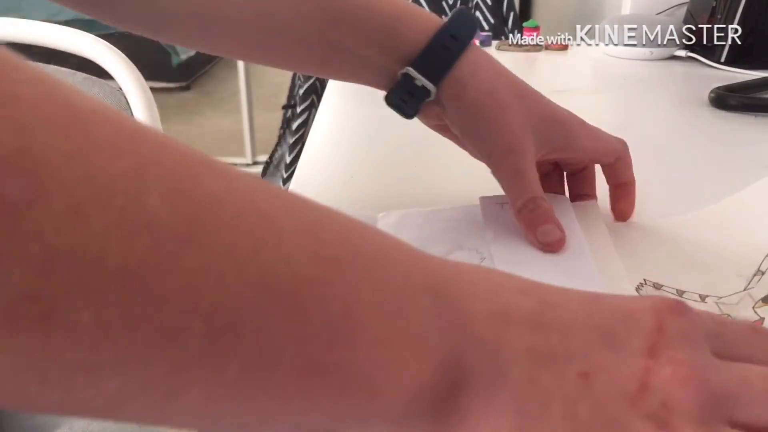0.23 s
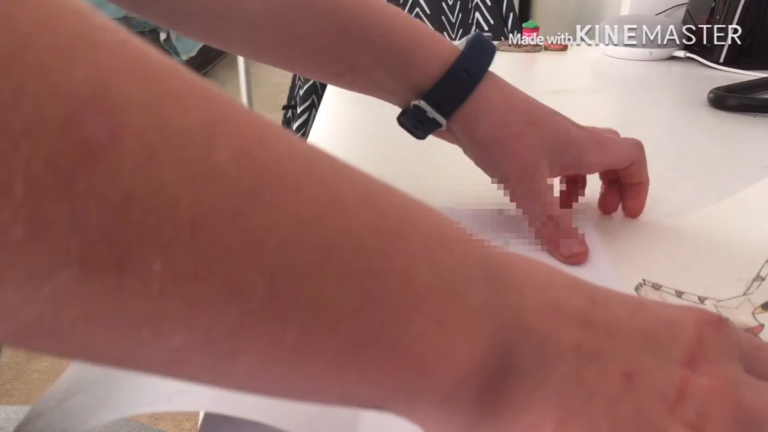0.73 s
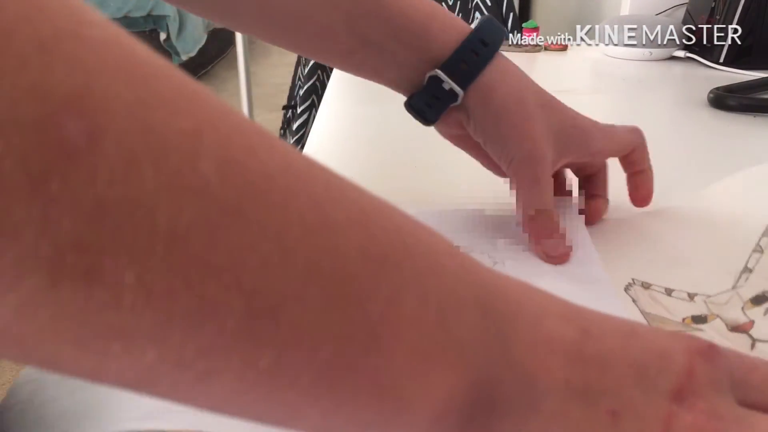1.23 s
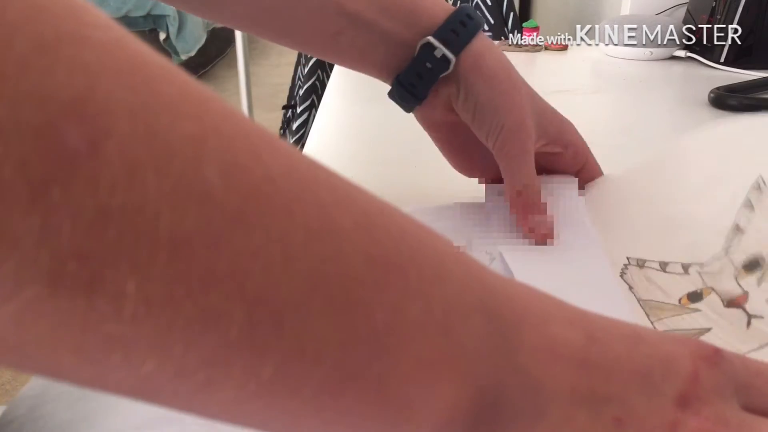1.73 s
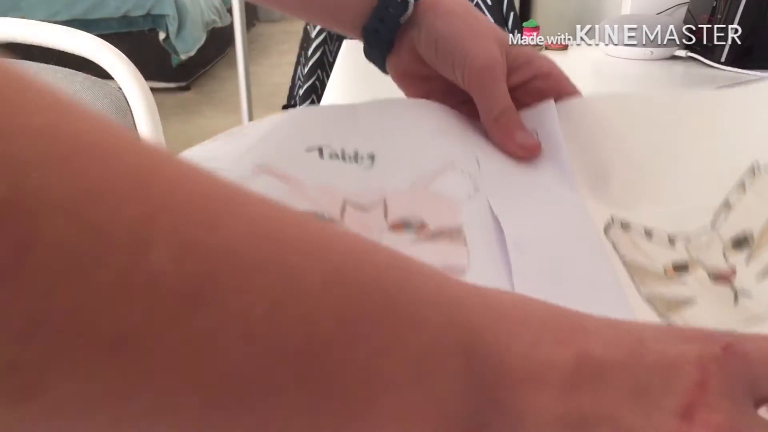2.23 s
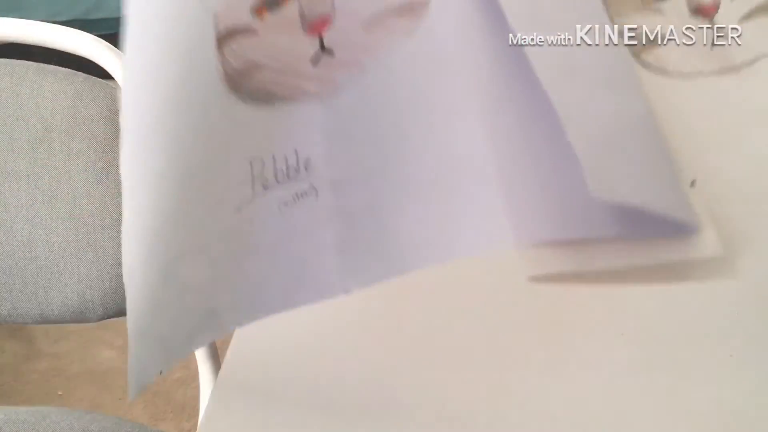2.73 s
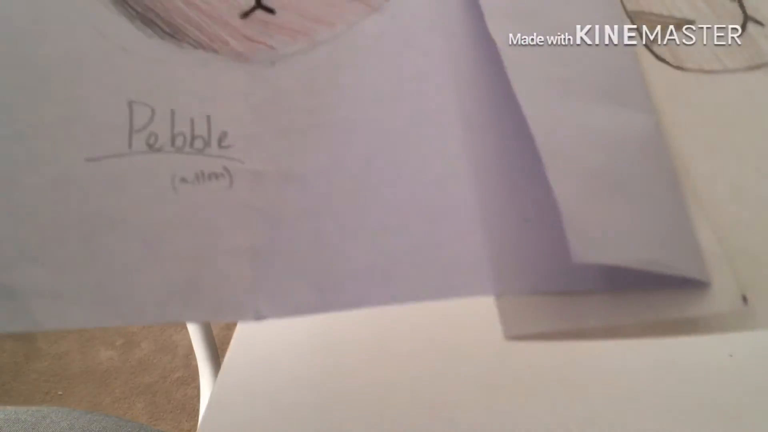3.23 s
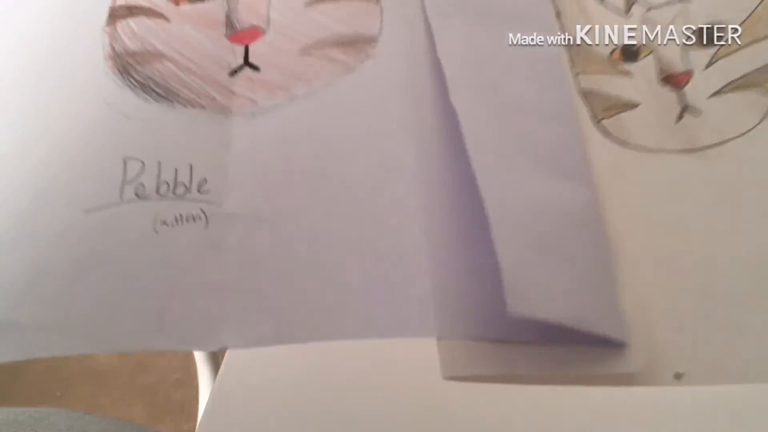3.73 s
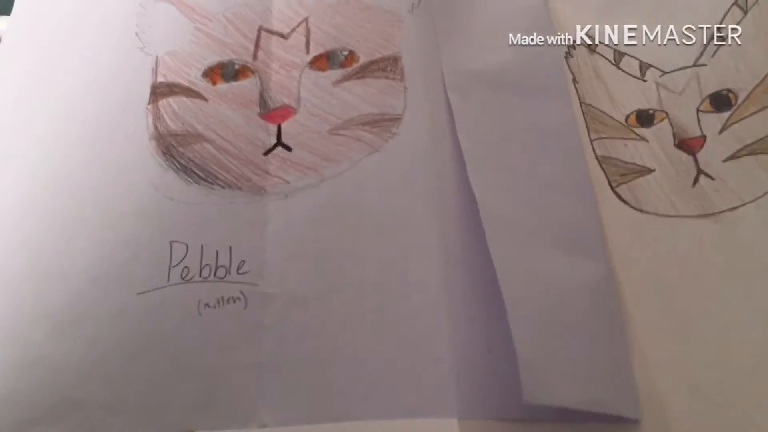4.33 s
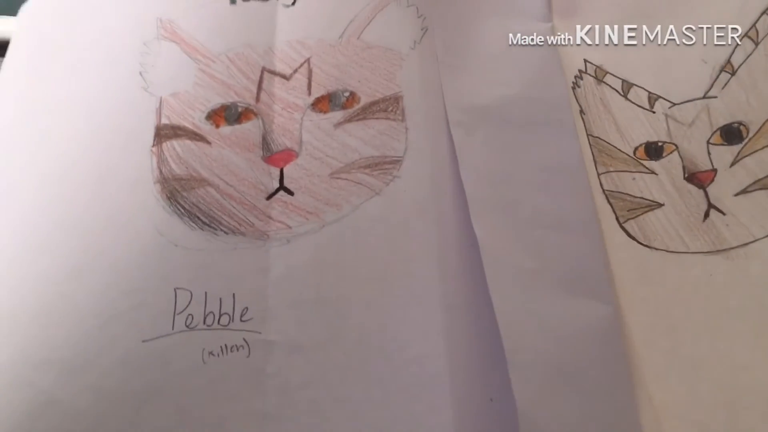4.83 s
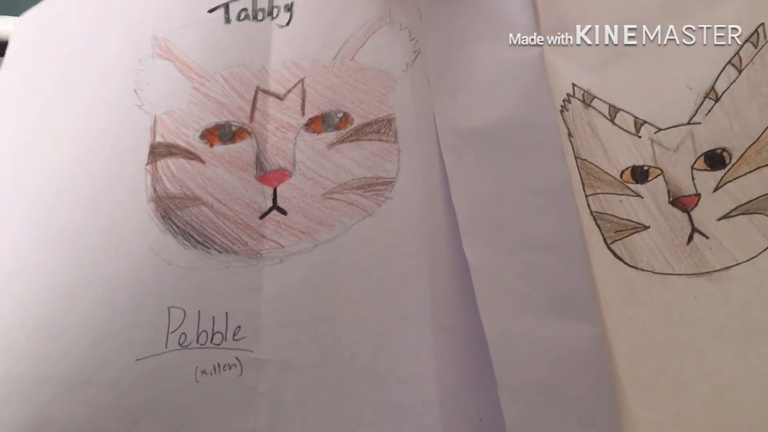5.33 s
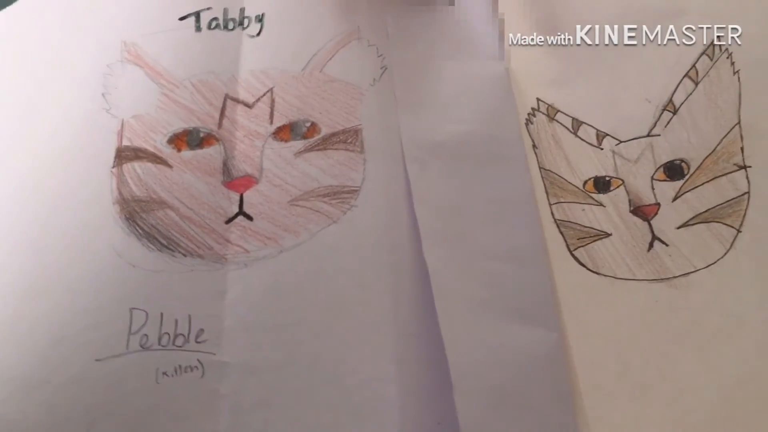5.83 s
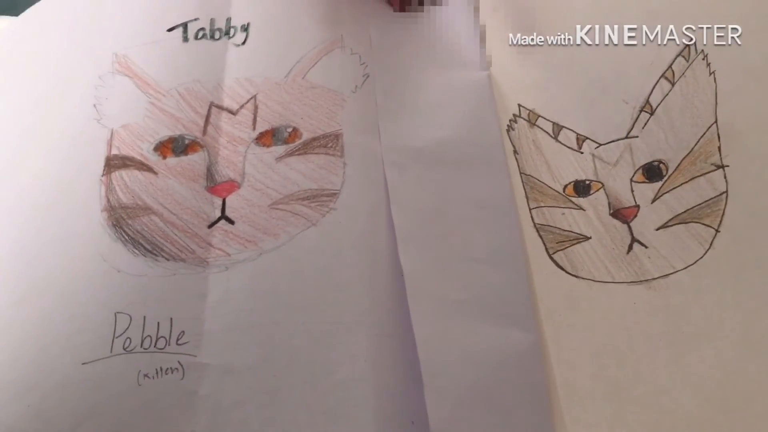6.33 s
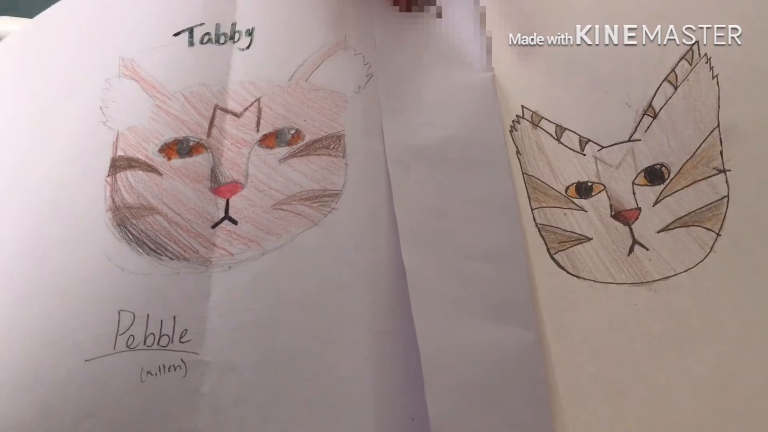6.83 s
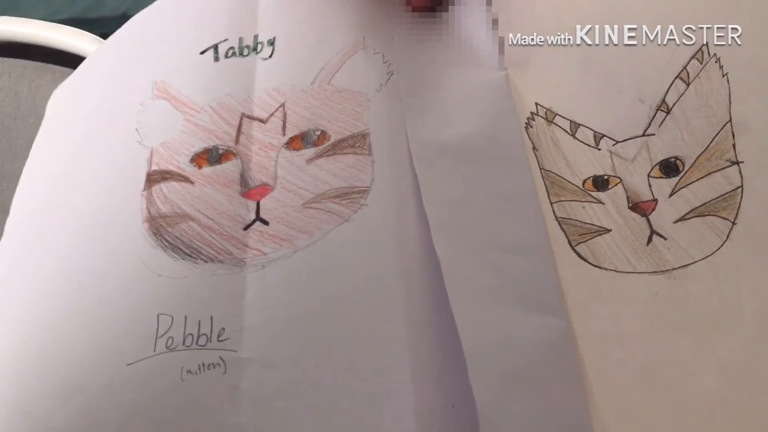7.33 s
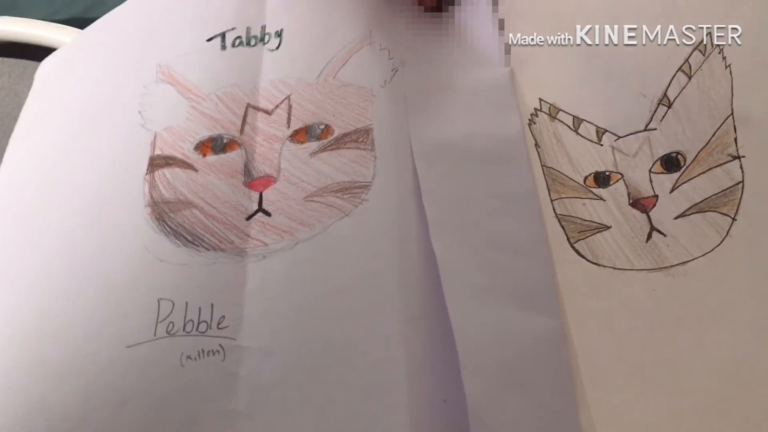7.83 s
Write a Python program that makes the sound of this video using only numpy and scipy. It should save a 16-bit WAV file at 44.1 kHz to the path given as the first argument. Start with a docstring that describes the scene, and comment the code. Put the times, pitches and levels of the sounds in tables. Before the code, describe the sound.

Close sheets of paper slide and crinkle indoors, with light knocks and a gritty drag that makes the desk drone.

```python
"""Over a low ventilation rumble, fingers lift and unfold paper on a desk, close to a hand-held phone.
The sheets rustle in tiny slips, creases snap, a fingertip squeaks, the desk top is bumped.
Around four seconds in, the paper quietens and small knocks farther off ring in the room.
From five to seven seconds something heavier drags over the desk in surges and makes its top drone.
A few last soft rubs follow, and a knock on something loose."""
import sys
import numpy as np
from scipy import signal
from scipy.io import wavfile
from scipy.ndimage import uniform_filter1d

SR = 44100
rng = np.random.default_rng(int(sys.argv[2]) if len(sys.argv) > 2 else 0)


def generate_wav(sig):
    """Save sig (samples, or channels by samples) to the path in sys.argv[1] as 16-bit PCM at SR."""
    pcm = np.round(np.clip(np.atleast_2d(sig).T, -1, 1) * 32767).astype(np.int16)
    wavfile.write(sys.argv[1], SR, pcm)


N = 356328

# The dull tone of the desk top under the hands. Each row: frequency in Hz, level in dB.
DESK_TONE = [(47, -28.5), (80, -15.5), (135, 5), (173, -0.5), (349, -2), (480, -3), (549, -3.5), (800, -13),
             (1040, -53), (1760, -120)]


def gain_of(db):
    """Turns dB into gain."""
    return 10 ** (np.asarray(db) / 20)


def unit_rms(x):
    """Scales to rms 1."""
    return x / np.sqrt(np.mean(x ** 2) + 1e-20)


def curve_at(points, hz):
    """Reads a curve on a log-frequency axis."""
    freqs, values = np.transpose(points)
    return np.interp(np.log(hz + 1), np.log(freqs + 1), values)


def colour(x, tone):
    """Minimum-phase EQ with the given curve; white noise keeps its level."""
    hz = abs(np.fft.fftfreq(4096, 1 / SR))
    log_gain = np.log(gain_of(np.maximum(curve_at(tone, hz), -100)))
    taps = np.fft.ifft(np.exp(np.conj(signal.hilbert(log_gain)))).real[:2048]
    return signal.oaconvolve(x, taps / np.linalg.norm(taps))[:len(x)]


def ring(x, modes):
    """Rings a set of damped modes; white noise keeps its level."""
    t = np.arange(12000) / SR
    taps = sum(gain_of(db) * np.sqrt(width) * np.exp(-np.pi * width * t) * np.sin(2 * np.pi * hz * t)
               for hz, width, db in modes)
    return signal.oaconvolve(x, taps / np.linalg.norm(taps))[:len(x)]


def resonate(x, hz, width_hz, share):
    """Blends in a resonance that follows hz; share is the wet part of the mix."""
    carrier = np.exp(2j * np.pi * np.cumsum(hz * np.ones(len(x))) / SR)
    pole = np.exp(-np.pi * width_hz / SR)
    peak = (carrier * signal.lfilter([1 - pole], [1, -pole], x / carrier)).real
    return np.sqrt(1 - share) * x + np.sqrt(share) * unit_rms(peak) * np.std(x)


def drift():
    """A random wander of rms 1, a few turns a second."""
    return unit_rms(uniform_filter1d(uniform_filter1d(rng.standard_normal(N), size=3000), size=3000))


def ventilation(level_db=-52.5, waver_db=2.5):
    """Moving air rumbles and wavers a little."""
    # The tone of the air. Each row: frequency in Hz, level in dB.
    air_tone = [(18, -38), (30, 0), (77, 3.5), (179, -4), (280, -2.5), (426, -8.5), (499, -43), (554, -48),
                (822, -45), (1590, -31), (2980, -40.5), (5740, -38), (7870, -58), (14400, -79),
                (16000, -44)]
    return gain_of(level_db + waver_db * drift()) * colour(rng.standard_normal(N), air_tone)


def friction(slips_per_s, spread_db, slip_s, smooth):
    """Grip in uneven slips over a steady floor: each swells quickly and dies away, a few are large."""
    sizes = gain_of(spread_db * np.minimum(rng.exponential(1, N), 4))
    onsets = rng.random(N) < slips_per_s / SR
    slips = signal.lfilter([1], [1, -np.exp(-1 / (slip_s * SR))], sizes * onsets)
    rounded = uniform_filter1d(slips, size=1 + round(slip_s * SR / 2))
    return unit_rms(smooth + unit_rms(rounded))


def shifting_contact(x, depth_db=1.6):
    """The contact keeps changing shape, so patches of the spectrum come and go."""
    spectrum = signal.stft(x, nperseg=512, noverlap=384)[2]
    patches = uniform_filter1d(rng.standard_normal(spectrum.shape), size=6, axis=0)
    patches = uniform_filter1d(patches, size=24, axis=1)
    gains = unit_rms(gain_of(depth_db * unit_rms(patches)))
    return signal.istft(spectrum * gains, nperseg=512, noverlap=384)[1][:N]


def rub(moves, grip, hiss_tone, sheet_tone, desk_filter, hiss_hz=5980, sheet_hz=1430, wander=0.2):
    """One grip pattern drives hiss, sheet and desk; the bright spots of hiss and sheet wander."""
    t = np.arange(N) / SR
    rows = np.vstack(moves)
    moving = sum((t >= move[0][0]) & (t <= move[-1][0]) for move in moves)
    hiss_gain, sheet_gain, desk_gain = (gain_of(np.interp(t, rows[:, 0], db)) for db in rows[:, 1:].T)
    hiss, sheet, desk = rng.standard_normal((3, N))
    hiss = resonate(colour(hiss, hiss_tone), hiss_hz * np.exp(wander * drift()), 480, share=0.032)
    sheet = resonate(colour(sheet, sheet_tone), sheet_hz * np.exp(wander * drift()), 220, share=0.12)
    layers = hiss_gain * hiss + sheet_gain * sheet + desk_gain * desk_filter(desk)
    return shifting_contact(moving * grip * layers)


def paper_rustle(desk_over_flex_db=1.5):
    """Dry sheets hiss as they slide and flex under fingers that also push on the desk."""
    # Finger moves, before and after the drag. Each row: time in seconds, hiss in dB, flex in dB.
    finger_moves = [
        [(0, -48.5, -56), (.09, -57.5, -62), (.14, -53, -48), (.3, -57.5, -53), (.41, -60, -55),
         (.54, -55, -51.5), (.7, -63, -63.5), (.78, -53.5, -57), (.84, -71, -63), (.9, -60, -55),
         (1, -56.5, -58.5), (1.05, -73, -67), (1.11, -70, -66.5), (1.16, -62, -55), (1.24, -73, -62),
         (1.37, -60, -58.5), (1.61, -54, -56.5), (1.8, -58.5, -59), (1.96, -58, -58), (2.15, -53, -56),
         (2.36, -54.5, -52), (2.69, -58, -61), (2.81, -55, -61.5), (2.97, -69.5, -66.5), (3.12, -69, -70),
         (3.33, -61, -65.5), (3.61, -64, -65.5), (3.9, -73, -70), (4.1, -74, -67.5), (4.5, -76, -70),
         (5.12, -76, -70), (5.22, -65, -62.5)],
        [(6.95, -73, -69), (7.12, -74, -70.5), (7.19, -66, -64), (7.42, -66.5, -65.5), (7.47, -75.5, -74),
         (7.85, -75.5, -77), (7.95, -71, -61), (8.08, -73, -70)],
    ]
    # The tones of paper on paper and of a bending sheet. Each row: frequency in Hz, level in dB.
    hiss_tone = [(1760, -21), (3000, -12), (3310, -13), (5710, -3.5), (7720, -8), (9270, -9), (10100, -14),
                 (12900, -13), (15100, -23), (16000, -19)]
    flex_tone = [(350, -25.5), (600, 5.5), (713, -3.5), (828, -1), (913, -5), (1040, -2.5), (1580, -4),
                 (1960, -8.5), (2550, -8.5), (3600, -24), (4680, -52), (7920, -120)]
    grip = friction(slips_per_s=70, spread_db=2.8, slip_s=0.012, smooth=2.2)
    crackle = friction(slips_per_s=200, spread_db=3.0, slip_s=0.0015, smooth=3.5)
    moves = [[(s, hiss, flex, flex + desk_over_flex_db) for s, hiss, flex in move]
             for move in finger_moves]
    return rub(moves, unit_rms(grip * crackle), hiss_tone, flex_tone, lambda x: colour(x, DESK_TONE))


def snaps_and_strokes(snap_rise_s=0.00096, snap_focus=0.78, stroke_focus=0.64, stroke_room_db=-24.5):
    """Paper snaps, rubbing strokes and drag surges build up and die away; returns direct and room send."""
    # Sudden snaps and knocks. Each row: time in seconds, crack peak, thud and pop in dB,
    # crack and pop pitch in Hz, seconds to fall 60 dB, room send in dB.
    snaps = [(0.4338, -38.5, -70, -44.5, 5500, 1050, 0.029, 5.5),
             (0.7298, -39, -46, -54, 7820, 789, 0.072, -17), (1.123, -43, -49, -51.5, 6170, 1550, 0.058, 5),
             (1.209, -48, -55, -44, 5730, 1580, 0.049, -23),
             (1.5477, -14, -29.5, -30, 7900, 1570, 0.043, -24),
             (1.5545, -33, -31.5, -44, 5740, 1440, 0.047, -11),
             (1.5825, -34, -54, -44, 5960, 1460, .04, -13), (1.868, -31, -53, -41, 4860, 1920, 0.04, -17),
             (1.8768, -12, -52, -28, 5260, 1420, 0.034, -24),
             (1.895, -21, -55, -27.5, 4900, 1390, .048, -11),
             (1.9038, -34, -45, -30, 5450, 1440, 0.046, -4),
             (1.922, -35, -34.5, -28.5, 3880, 1950, 0.046, -26),
             (1.9958, -14, -32, -26.5, 6600, 1930, 0.026, -26),
             (2.122, -26.5, -56, -38.5, 6900, 2550, .022, -22),
             (2.1639, -33, -31, -32, 5670, 1490, 0.054, -5),
             (2.1974, -44, -58, -36, 5290, 1620, 0.032, -23), (2.232, -47, -52, -36, 5970, 1450, .087, -17),
             (2.2996, -26.5, -44, -36, 4600, 1980, 0.021, -9),
             (2.3326, -27, -33.5, -28.5, 5990, 1470, .069, -19),
             (2.545, -45, -47, -52.5, 6170, 1650, .032, 9.5),
             (2.6944, -57, -56, -45, 3610, 1570, 0.059, -14),
             (2.7223, -24, -41.5, -34.5, 5670, 1540, 0.085, -11),
             (2.753, -30, -34.5, -27, 5160, 1540, 0.06, -16.5),
             (2.796, -46, -40.5, -44, 5620, 1530, 0.063, -19),
             (2.839, -46, -54, -51, 6360, 1380, .036, -15), (3.1547, -41, -48, -51.5, 5430, 1600, 0.1, -1),
             (3.2457, -45, -45.5, -45, 5250, 1540, 0.066, -8),
             (3.3712, -66, -42, -56.5, 6120, 1390, 0.04, 8.5),
             (3.585, -58, -64, -54.5, 5800, 2510, 0.057, -8),
             (3.669, -50, -60, -53, 5800, 2660, 0.053, -17), (3.633, -51, -74, -60.5, 4520, 1330, 0.047, 5),
             (3.7673, -49, -49, -51, 6040, 1120, 0.025, -3),
             (4.122, -54, -42.5, -51, 5700, 1630, 0.029, -24),
             (4.586, -66, -75, -57.5, 5800, 1830, 0.1, -3), (5.241, -52, -58, -49.5, 5700, 2620, 0.091, -3),
             (5.374, -41, -59, -42.5, 4230, 2640, 0.21, -15), (5.4276, -28, -54, -35, 4130, 2780, 0.077, 1),
             (5.6299, -29.5, -36, -37, 6270, 2650, 0.043, 1),
             (5.7311, -26.5, -51, -38.5, 5020, 1270, 0.24, -22.5),
             (6.0562, -26.5, -31, -38, 7140, 2200, 0.078, 3.5),
             (6.2934, -42, -31.5, -30.5, 5960, 680, 0.052, -2.5),
             (7.3069, -48, -44, -46, 4510, 1240, 0.067, -15), (7.345, -59, -48, -58, 5610, 1340, .039, -10),
             (7.4866, -54.5, -61, -70, 5930, 1560, 0.05, -12),
             (7.8986, -53, -42, -48.5, 3780, 915, 0.098, -1)]
    # Strokes that swell and break off. Each row: time in seconds, hiss peak, thud and pop in dB,
    # hiss and pop pitch in Hz, seconds to fall 60 dB, rise time in seconds.
    strokes = [(0.013, -38.5, -37, -36.5, 5000, 1530, 0.082, 0.023),
               (0.163, -51, -40, -47, 6000, 790, 0.19, .02), (.26, -52, -48, -54, 6000, 900, 0.17, 0.018),
               (.47, -55, -55, -49, 6100, 895, 0.18, .02),
               (0.529, -46.5, -46.5, -48, 6100, 1050, .2, 0.048),
               (0.761, -53, -65, -57, 6400, 1600, 0.1, 0.027),
               (0.989, -58, -42.5, -47.5, 6500, 930, 0.21, 0.014),
               (1.17, -52, -48, -56, 6560, 1490, .2, 0.028),
               (1.27, -29, -53, -43, 9000, 1790, 0.043, 0.0082),
               (1.305, -51, -35, -42, 6000, 910, 0.15, 0.014),
               (1.285, -19.5, -40, -22.5, 5560, 1790, 0.047, 0.0074),
               (1.62, -34.5, -42, -49, 7000, 1500, 0.23, .006),
               (1.742, -32, -42.5, -44.5, 8300, 1850, 0.066, 0.023),
               (2.009, -36, -55, -46, 6300, 1900, 0.082, 0.025),
               (2.14, -20.5, -38, -26.5, 6050, 2690, 0.07, 0.0043),
               (2.261, -36, -66, -62, 6400, 1480, 0.1, 0.026),
               (2.644, -38, -56, -46, 4660, 1610, 0.21, 0.028),
               (3.42, -70, -46, -63, 6000, 1000, 0.28, .03), (4.06, -55, -65, -75, 5200, 1400, 0.051, 0.16),
               (4.669, -54.5, -75, -66, 7460, 1280, 0.8, 0.012),
               (4.851, -54, -67.5, -65, 5600, 1280, 0.13, 0.21),
               (5.08, -51.5, -64, -62, 5950, 1490, .12, 0.032),
               (5.549, -39.5, -51, -61, 13100, 2000, 0.083, 0.19),
               (5.69, -29.5, -50, -48, 7000, 1300, 0.11, 0.025),
               (5.9, -38, -52, -50, 11000, 1300, 0.3, 0.033),
               (6.117, -27, -41, -39, 7000, 2720, 0.32, 0.018),
               (6.24, -27, -36, -38, 7550, 1320, 0.41, 0.05),
               (6.52, -31, -57, -45, 9700, 1300, 0.36, 0.0048),
               (6.71, -41.5, -55, -62, 6200, 1300, 0.3, 0.027),
               (6.8, -40.5, -62.5, -59, 10100, 1290, 0.47, 0.17), (7.4, -57, -70, -65, 6000, 1530, .2, .03),
               (7.53, -61, -70, -63.5, 6000, 1490, 0.17, 0.061),
               (7.67, -60.5, -61, -64.5, 6000, 1510, .15, 0.043)]
    # The bright tone of crack and hiss. Each row: frequency in Hz, level in dB.
    crack_tone = [(1760, -50), (3000, -6), (3740, 0), (4740, 4), (6670, 4), (9000, 1), (10200, -3),
                  (13100, -3.5), (15700, -13), (16500, -50)]
    # The modes of a popping sheet. Each row: frequency in Hz, width in Hz, level in dB.
    sheet_modes = [(895, 300, -31), (1264, 160, 0), (1710, 950, 23.5), (2180, 390, 10), (2520, 79, 7.5),
                   (2830, 410, -30)]
    out, lead = np.zeros((2, N + SR)), round(0.1 * SR)
    t = np.arange(-lead, round(0.3 * SR)) / SR
    events = [(*row, snap_rise_s, snap_focus) for row in snaps]
    events += [(*row[:-1], stroke_room_db, row[-1], stroke_focus) for row in strokes]
    for s, crack_db, thud_db, pop_db, crack_hz, pop_hz, t60, room_db, rise, focus in events:
        envelope = np.where(t < 0, np.exp(np.minimum(t, 0) / rise), gain_of(-60 * t / t60))
        crack, thud, pop = envelope * rng.standard_normal((3, len(t)))
        accent = 1 + 0.86 * np.exp(-abs(t) / (0.66 * rise))  # the treble is sharpest at the peak
        crack = resonate(colour(accent * crack, crack_tone), crack_hz, width_hz=3400, share=focus)
        thud = resonate(colour(thud, DESK_TONE), hz=245, width_hz=320, share=0.35)
        pop = resonate(ring(pop, sheet_modes), pop_hz, width_hz=154, share=0.31)
        body = gain_of(thud_db) * unit_rms(thud) + gain_of(pop_db) * unit_rms(pop)
        envelope_rms = np.sqrt(np.mean(envelope ** 2))
        sound = gain_of(crack_db) * crack / abs(crack).max() + envelope_rms * body
        at = round(s * SR)
        out[:, at:at + len(t)] += [sound, gain_of(room_db) * sound]
    return out[:, lead:lead + N]


def finger_squeaks(width_hz=150):
    """A fingertip sticks on the paper: a narrow, fuzzy whistle that swells and fades."""
    # The squeaks. Each row: start in seconds, length in seconds, pitch in Hz, level in dB.
    squeaks = [(0.025, 0.095, 4350, -59), (2.86, .17, 3800, -65.5)]
    out = np.zeros(N)
    for s, length, hz, db in squeaks:
        size, at = round(length * SR), round(s * SR)
        whistle = ring(rng.standard_normal(size), [(hz, width_hz, 0)])
        out[at:at + size] += gain_of(db) * np.hanning(size) * whistle
    return out


def knocks():
    """A hard contact ticks and sets one body ringing; returns the direct sound and the room send."""
    # The hits. Each row: body struck, start in seconds, ring peak, tick peak and room send in dB.
    hits = [("desk top", 0.15, -37, -55, -8), ("desk top", 0.225, -26.5, -40, -6),
            ("desk top", 0.97, -35, -64, -8), ("desk top", 2.7, -50, -58, -3),
            ("far furniture", 4.2275, -35, -37.5, 3.7), ("far furniture", 4.298, -35.5, -54, 0),
            ("dragged thing", 5.2665, -32, -32, 2), ("dragged thing", 6.515, -30, -36, 2),
            ("loose thing", 7.916, -34, -47, -4)]
    # The hollow modes of each body. Each row: frequency in Hz, width in Hz, level in dB.
    body_modes = {"desk top": [(138.4, 9.4, -7.5), (557, 82, 1), (840, 110, -8), (1300, 74, -20)],
                  "far furniture": [(151.4, 13, 2.5), (214, 10, -0.5), (270, 15, -6), (401, 21, -5),
                  (590, 39, -7), (740, 22, -2), (1080, 27, -7.5), (1520, 30, -15), (2205, 31, -5),
                  (2870, 54, -6)], "dragged thing": [(436, 9, 0), (490, 12, -2), (535, 14, -6),
                  (813, 12, -13), (930, 14, -9), (1280, 25, -12), (2299, 20, -17)],
                  "loose thing": [(158, 16, -6), (277, 56, 6), (555, 140, 0.5), (910, 60, 1),
                  (1313, 68, -5.5), (1990, 40, -11)]}
    # The tone of the contact. Each row: frequency in Hz, level in dB.
    tick_tone = [(470, -55), (800, -10.5), (1950, -5.5), (2180, -5), (3420, -10), (6170, -10.5),
                 (13400, -29), (16000, -29)]
    out = np.zeros((2, N + SR))
    t = np.arange(round(0.3 * SR)) / SR
    for body, s, ring_db, tick_db, room_db in hits:
        noise = rng.standard_normal(len(t))
        impact = np.exp(-t / 0.0001)
        rattle = 0.035 * np.exp(-t / 0.03) * noise
        hollow = ring(impact + rattle, body_modes[body])
        hollow *= 1 - np.exp(-t / 0.0082)  # the ring spreads through the body in a few ms
        hollow *= gain_of(ring_db) / abs(hollow).max()
        tick = colour(np.exp(-t / 0.015) * noise, tick_tone)
        tick *= gain_of(tick_db) / abs(tick).max()
        at = round(s * SR)
        out[:, at:at + len(t)] += [hollow + tick, gain_of(room_db) * (tick + gain_of(-4) * hollow)]
    return out[:, :N]


def desk_drag():
    """Something heavier slides with a dense, gritty friction that makes the desk top drone."""
    # The slide. Each row: time in seconds, then hiss, scrape and drone in dB.
    slide = [(5.2, -80, -73, -61), (5.23, -73, -66, -59), (5.244, -65, -69, -75), (5.264, -61, -58, -52),
             (5.3, -65, -52, -41.5), (5.434, -61.5, -55, -48), (5.73, -46, -45, -39),
             (5.806, -46, -39.5, -31), (5.83, -43.5, -41.5, -37), (5.936, -41, -38.5, -33),
             (6.046, -47, -45.5, -40), (6.092, -43.5, -38.5, -30.5), (6.186, -44.5, -38.5, -34),
             (6.302, -45, -45, -27.5), (6.312, -50, -47, -32.5), (6.512, -60, -56, -49),
             (6.538, -67, -53, -41), (6.694, -57, -56, -52.5), (6.904, -69, -65.5, -62.5),
             (7.0, -79, -73, -70)]
    # The tones of its hiss and its scrape. Each row: frequency in Hz, level in dB.
    hiss_tone = [(1760, -22), (3000, -3.5), (3600, -15), (3910, 0), (4660, -3), (6090, 0), (9140, -4.5),
                 (13100, -10.5), (15100, -24), (16000, -16)]
    scrape_tone = [(350, -19), (600, -13), (656, 3), (1040, -2), (1110, -11), (1280, 3.5), (1450, -8),
                   (1990, -6), (2670, -2.5), (3050, -11.5), (3600, -12.5), (4680, -22), (7920, -120)]
    # The droning modes of the desk. Each row: frequency in Hz, width in Hz, level in dB.
    desk_modes = [(144.3, 6.3, -5.5), (226, 40, -25), (268, 44, 3), (345, 15, 6), (431, 74, 10.5),
                  (500, 14, 1), (540, 43, -23), (652, 35, -7.5)]
    grip = friction(slips_per_s=84, spread_db=1.5, slip_s=0.004, smooth=4.2)
    grit = friction(slips_per_s=500, spread_db=3.0, slip_s=0.0014, smooth=4)
    sound = rub([slide], unit_rms(grip * grit), hiss_tone, scrape_tone, lambda x: ring(x, desk_modes))
    low_cut = signal.butter(2, 120, "high", fs=SR, output="sos")  # keeps deep rumble out of the drone
    return signal.sosfilt(low_cut, sound)


def room(x):
    """Sparse reflections of random sign, each band dying at its own speed."""
    # The decay of the room. Each row: frequency in Hz, seconds to fall 60 dB.
    decay_times = [(150, 0.37), (600, 0.33), (2000, 0.4), (6000, 0.33), (14000, 0.34)]
    taps = np.zeros(SR)
    at = np.arange(300, SR - 20, 20) + rng.integers(0, 20, (SR - 301) // 20)
    taps[at] = rng.choice([-1., 1.], len(at))
    hz, t, spectrum = signal.stft(taps, SR, nperseg=256)
    fade = gain_of(-60 * t / curve_at(decay_times, hz)[:, None])
    tail = signal.istft(spectrum * fade, SR, nperseg=256)[1]
    return signal.fftconvolve(x, tail / np.linalg.norm(tail))[:N]


def scene():
    """Paper, knocks and drag in the room, over the ventilation."""
    direct, send = snaps_and_strokes() + knocks()
    rubbing = paper_rustle() + desk_drag() + finger_squeaks()
    reverb = room(send + gain_of(-10) * rubbing)
    return (direct + rubbing + reverb + ventilation())[None]


def record(dry, low_hz=55, high_hz=15900):
    """The phone drops the deep bass and the very top of the treble."""
    thin = signal.sosfilt(signal.butter(3, low_hz, "high", fs=SR, output="sos"), dry)
    high_cut = signal.firwin(511, high_hz, window=("kaiser", 9), fs=SR)
    return signal.oaconvolve(thin, high_cut[None], "same")


dry = scene()
out = record(dry)
generate_wav(out)
```